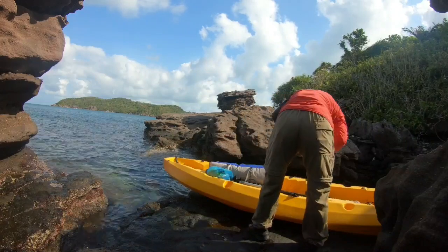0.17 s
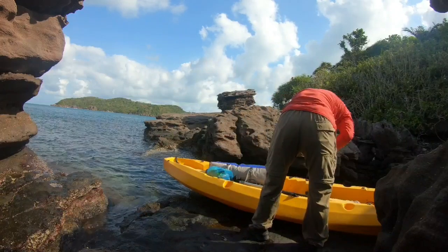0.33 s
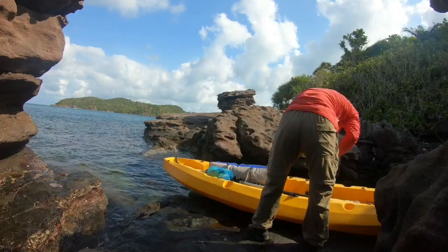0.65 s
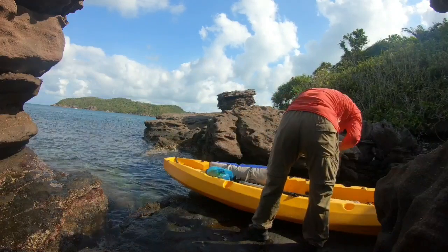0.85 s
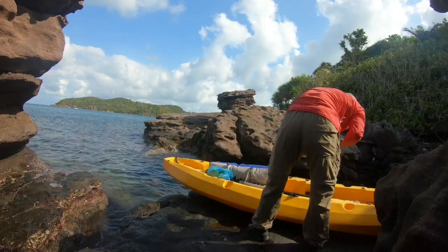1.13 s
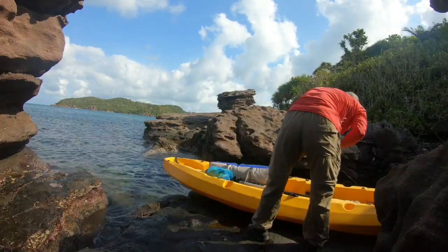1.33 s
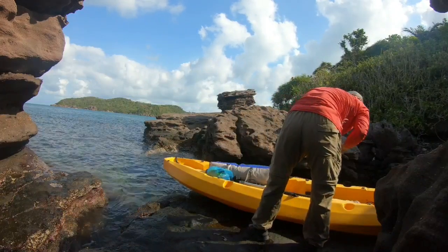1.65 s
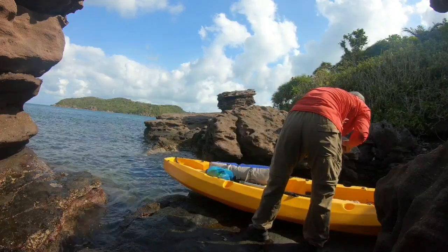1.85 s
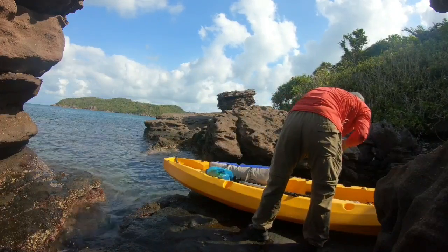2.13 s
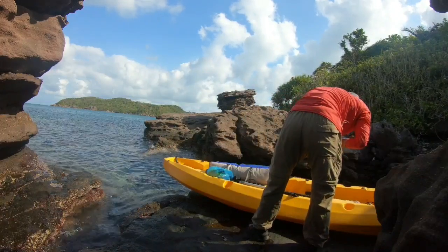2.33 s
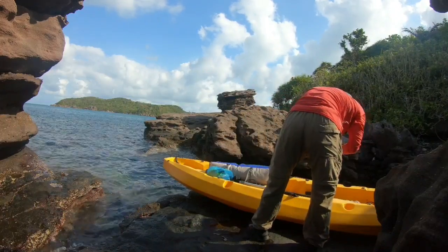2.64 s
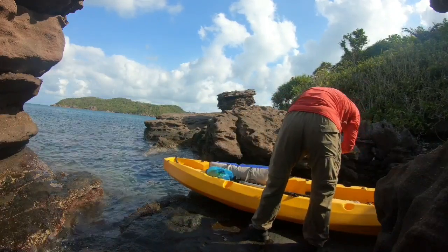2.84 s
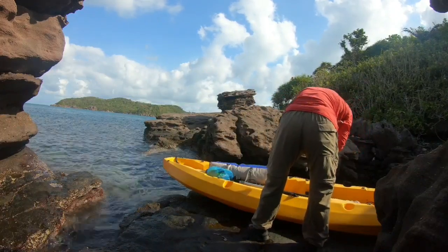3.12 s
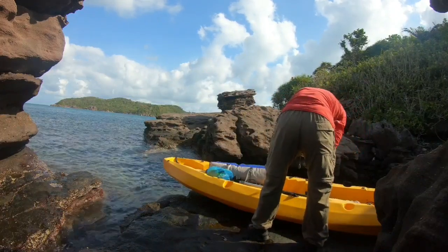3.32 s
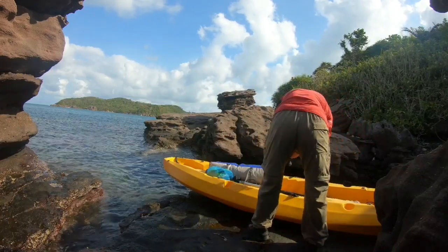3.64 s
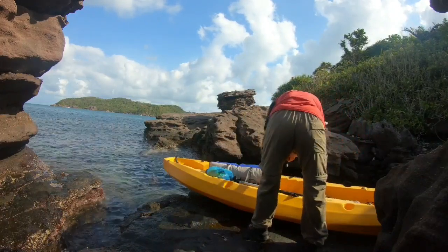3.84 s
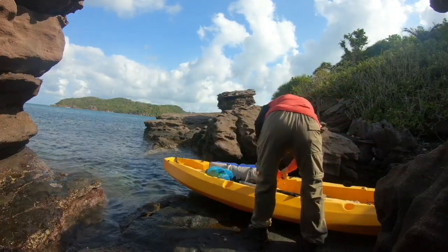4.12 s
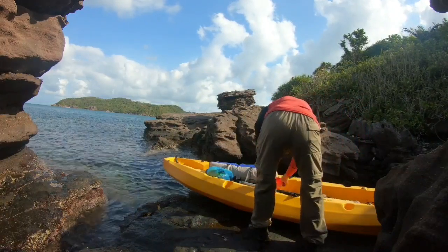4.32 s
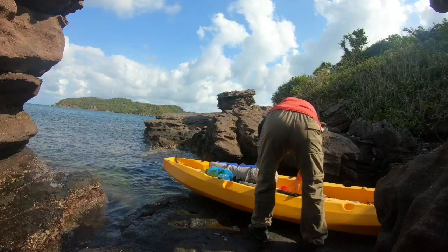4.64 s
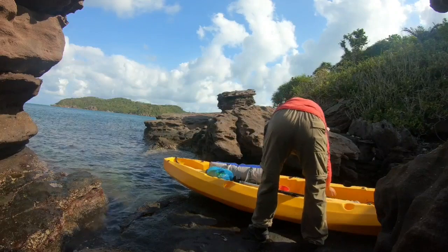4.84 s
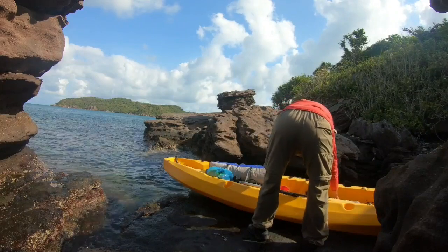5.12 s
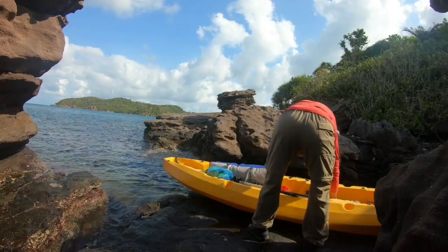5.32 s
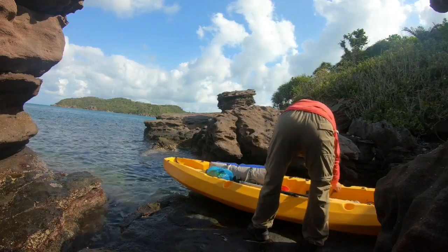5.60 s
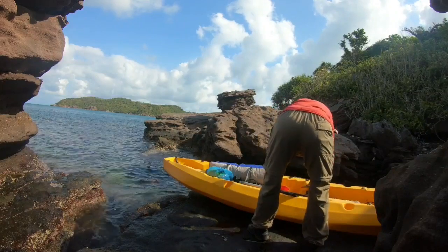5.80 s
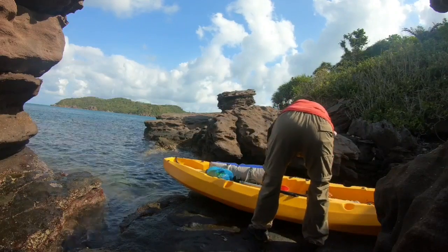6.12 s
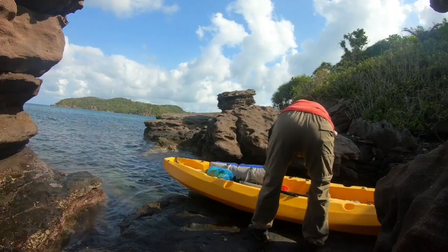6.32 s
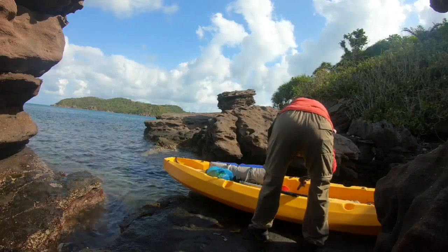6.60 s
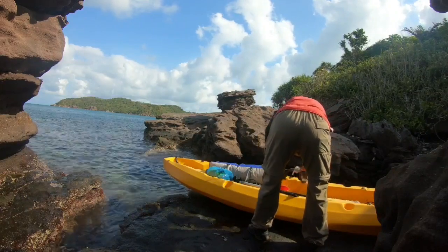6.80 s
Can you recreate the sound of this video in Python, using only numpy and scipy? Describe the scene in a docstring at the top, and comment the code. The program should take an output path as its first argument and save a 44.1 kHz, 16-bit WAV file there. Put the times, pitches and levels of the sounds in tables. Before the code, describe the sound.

Small sea waves wash, fizz and gurgle over shoreline rocks while gear knocks hollowly in a plastic kayak.

```python
"""Small waves wash over shoreline rocks beside a plastic kayak. First foam fizzes, water slaps and pockets of
air gulp. From 2 s a swell builds: gear knocks, water gurgles under the hull and a hollow there hums twice. It
crests near 2.8 s with a puff of breeze, then drains while drops tick. Gear clatters on the hull at 4.5 s and
again at 6 s, as a second swell runs in to the end. Throughout, a faint low rumble runs and two microphone ports
in a small housing colour each side."""
import sys
import numpy as np
from scipy import signal
from scipy.fft import rfft, irfft
from scipy.io import wavfile
from scipy.ndimage import uniform_filter1d

SR = 44100
rng = np.random.default_rng(int(sys.argv[2]) if len(sys.argv) > 2 else 0)


def store_wav(level_fs):
    """Save 16-bit WAV to argv[1]."""
    pcm = np.round(np.clip(np.atleast_2d(level_fs), -1, 1) * 32767)
    wavfile.write(sys.argv[1], SR, pcm.T.astype(np.int16))


N = 306936
TIME = np.arange(N) / SR

# Two swells run in and drain away: t/s, fizz level/dB, slosh over fizz/dB
SWELLS = [(0, -58, -16), (0.45, -59.5, -12.5), (0.7, -55, -16), (0.9, -53, -16), (1.1, -54, -28),
          (1.45, -49.5, -10.5), (1.95, -49, -10), (2.2, -44.5, -12.5), (2.6, -42.5, -14), (2.688, -49, -24),
          (2.78, -41, -5.5), (3.1, -46.5, -9), (3.25, -51.5, -7.5), (3.6, -55, -10), (4.15, -60.5, -13),
          (4.65, -59.5, -19), (4.9, -58, -9), (5.5, -56, -16), (5.7, -53.5, -9.5), (6.3, -49.5, -17),
          (6.96, -49, -13)]


def swells(spray_db=-15.5, lumps_db=2):
    """Slow envelopes of the wash: fizz, spattering spray above it, lumpy slosh below."""
    times, *columns = np.transpose(SWELLS)
    fizz_db, slosh_db = [np.interp(TIME, times, column) for column in columns]
    fizz, spray, slosh = from_db([fizz_db, fizz_db + spray_db, fizz_db + slosh_db + lumps_db * drift(7.7)])
    return np.array([fizz, spray * spatter(), slosh])


# Water slaps rock or hull: t/s, fizz level/dB, spray over fizz/dB, slosh over fizz/dB, fall/ms
SLAPS = [(0.369, -59.5, -6.5, -24, 50), (0.595, -52, -21, -17, 26), (0.655, -72, -22, 8.5, 14),
         (0.712, -50, -15, -27, 6.1), (0.75, -56, -6, -20, 1.5), (0.7752, -58, 2, -20, 1.2),
         (0.782, -50, -18, -11, 9.4), (0.7838, -63, -6, -20, 0.97), (0.74, -63.5, -20, -7, 18),
         (0.81, -60.5, -20, 0.5, 40), (0.87, -61.5, -15, 1, 19), (1.03, -58, -12, -7, 41),
         (1.15, -60, -9, -0.5, 37), (1.3945, -55.5, -4, -20, 1.3), (1.44, -50, -20, -11, 26),
         (1.68, -55.5, -5, 1, 10), (1.839, -52.5, -2, -20, 1.3), (1.893, -45.5, -13, -31, 47),
         (2.15, -47, -11, -21, 40), (2.25, -40, -17, -24, 22), (2.427, -40, -10, -7.5, 37),
         (2.472, -39.5, -15.5, -9.5, 29), (2.602, -46, -25, -23, 5.4), (2.625, -50, -10, -2, 42),
         (2.744, -38.5, -15, -28, 9.4), (2.854, -38.5, -18, -3.5, 14), (2.92, -44.5, -15.5, -16, 47),
         (3.06, -42, -17, -1, 21), (3.136, -56, 5.5, -15, 3.3), (3.33, -53.5, -35, 3, 21),
         (3.38, -52.5, -20, -20, 22), (3.43, -54.5, -28, 2.5, 11.5), (3.545, -51, -18, -2, 41),
         (3.675, -50, -15.5, -11, 8.5), (3.886, -59, -9, -16, 9.1), (4.469, -62, -6, -10, 2.7),
         (4.479, -59, 5, -10, 1.3), (4.495, -66, -5, -10, 3), (4.499, -53.5, -18, 5, 42),
         (4.52, -64, -2, -10, 2.5), (4.688, -57, -39, -20, 8.1), (4.974, -72, -16, -10, 7.4),
         (5.4, -62, -7, -15, 17), (5.457, -54, -16, -13, 13), (5.52, -52, -20, -15, 20),
         (5.58, -58, -10, -23, 12), (5.726, -53, -13, -12, 29), (5.821, -54.5, -3.5, -19, 5.4),
         (5.957, -63, -18, -17, 6), (5.992, -48.5, -11.5, -23, 16), (6.1, -53, -6.5, -3, 37),
         (6.18, -50, -14, -13, 9.5), (6.25, -56.5, -7, -1.5, 11), (6.301, -47.5, -18, -11, 28),
         (6.42, -49.5, -9, -19, 25), (6.539, -46.5, -13, -18, 31), (6.594, -48, -13.5, -11.5, 25),
         (6.67, -54.5, -9.5, 1, 38), (6.75, -40.5, -12, -8.5, 42), (6.795, -42, -21, -7.5, 35)]


def slaps():
    """Slap envelopes of fizz, spray and slosh: a fast attack, fastest in the spray, and a slower fall."""
    out = np.zeros((3, N))
    attack_share = 0.64 * np.array([[1], [.6], [1.2]])
    for s, fizz_db, spray_db, slosh_db, fall_ms in SLAPS:
        at = slice(max(int((s - .15) * SR), 0), int((s + .25) * SR))
        ms = (TIME[at] - s) * 1000
        attack = np.exp(-.5 * (ms / (attack_share * fall_ms)) ** 2)
        fall = np.exp(-.5 * (np.abs(ms) / fall_ms) ** 2.34)
        levels = from_db(fizz_db + np.array([[0], [spray_db], [slosh_db]]))
        out[:, at] += levels * np.where(ms < 0, attack, fall)
    return out


def foam(envelopes, laps_db=-8.5, patchy_db=1.8):
    """Dense bursting foam in narrow, drifting stereo bands; little laps jump up in all and die away."""
    bursts = rms_one(grains(2500, 1.83, count=3)) + 0.88 * rng.standard_normal((3, N))
    bursts = ports(bursts[0], bursts[1:])
    laps = rms_one(1 + from_db(laps_db) * jumps(per_s=40, spread_db=0.22, t60=.08, soften_samples=200))
    fizz_hz = np.geomspace(850, 3800, 9)
    spray_hz = np.geomspace(3800, 19000, 11)
    slosh_hz = np.geomspace(430, 950, 4)
    lap_depths = (1, .4, 1)   # the spray follows the laps only in part
    out = 0
    for envelope, edges, depth in zip(envelopes, (fizz_hz, spray_hz, slosh_hz), lap_depths):
        bands = [butter(bursts, 2, pair, "band") for pair in zip(edges, edges[1:])]
        layer = sum((-1) ** k * band * from_db(patchy_db * drift(18)) for k, band in enumerate(bands))
        out += envelope * laps ** depth * layer / np.sqrt(np.mean(layer.mean(0) ** 2))
    return out


def spatter(depth_db=-12):
    """Gain on the spray: each landing drop kicks it up within a few milliseconds and dies quickly."""
    return 1 + from_db(depth_db) * jumps(per_s=40, spread_db=2.6, t60=.03, soften_samples=120)


# Trapped air gulps and drops plink: t/s, f/Hz, peak level/dB
GULPS = [(0.607, 1320, -54), (0.636, 1460, -49.5), (0.62, 850, -50), (0.645, 654, -40), (0.665, 1240, -48),
         (0.73, 1450, -49), (0.74, 820, -49), (0.815, 1190, -48), (0.885, 690, -47), (0.765, 1300, -49),
         (0.8, 1340, -58), (0.83, 1290, -49), (0.874, 1100, -45), (0.928, 1350, -48), (1.0, 1250, -46),
         (1.016, 1330, -50), (1.032, 1370, -49), (1.048, 1300, -46), (1.068, 1300, -48), (1.084, 1320, -54),
         (1.101, 1330, -50), (1.117, 1320, -49), (1.132, 820, -44), (1.155, 1440, -47), (1.155, 855, -46),
         (1.176, 1330, -51), (1.18, 830, -52), (1.46, 1440, -42), (1.26, 800, -45), (1.33, 350, -63),
         (1.452, 602, -35), (1.517, 837, -38), (1.579, 410, -41.5), (1.607, 380, -49.5), (1.67, 1500, -50),
         (1.698, 865, -34.5), (1.722, 2490, -42), (1.878, 327, -51), (2.063, 225, -48.5),
         (2.09, 600, -35.5), (2.106, 1170, -41), (2.143, 297, -45), (2.153, 590, -24), (2.29, 344, -44),
         (2.31, 610, -43), (2.62, 400, -34), (2.623, 314, -44), (2.432, 807, -32), (2.435, 338, -41),
         (2.461, 356, -33), (2.844, 359, -34), (2.604, 569, -25.5), (2.7, 290, -52), (2.728, 268, -51),
         (2.75, 201, -52), (2.8, 620, -33), (2.83, 403, -40), (2.86, 640, -34), (2.87, 354, -47),
         (2.854, 813, -20.5), (2.914, 1450, -38), (2.993, 1360, -37), (3.068, 607, -32),
         (3.255, 414, -41.5), (3.275, 2540, -44.5), (3.319, 960, -36), (3.335, 1570, -40.5),
         (3.374, 1590, -37), (3.385, 1390, -42), (3.4, 1430, -42), (3.426, 1300, -45), (3.52, 1430, -48),
         (3.59, 2900, -45), (3.538, 1670, -39), (3.555, 1680, -45), (3.546, 1350, -45), (3.553, 900, -32),
         (3.556, 305, -50), (3.641, 836, -42), (3.676, 1434, -54), (3.749, 1480, -49), (3.88, 810, -48),
         (4.07, 840, -52), (4.919, 312, -50.5), (4.973, 1177, -44), (5.033, 275, -58), (5.19, 261, -51),
         (5.223, 306, -50), (5.261, 227, -54), (5.485, 860, -44), (5.59, 1470, -50), (5.67, 630, -42.5),
         (5.725, 1060, -42), (5.761, 1850, -47), (5.89, 1550, -45), (6.09, 1390, -49), (6.26, 1420, -45),
         (6.339, 567, -39), (6.43, 315, -46), (6.54, 850, -37), (6.519, 201, -51.5), (6.6, 159, -59),
         (6.666, 635, -34), (6.695, 385, -41), (6.753, 344, -31.5), (6.77, 885, -19), (6.742, 660, -53),
         (6.794, 260, -51), (6.8, 627, -32), (6.823, 330, -45), (6.858, 320, -52)]


def gulps(rise=0.017, waver=0.068, rough=0.31, smooth_below_hz=690):
    """Each pocket of air sings a short, unsteady note whose pitch climbs as it nears the surface."""
    out = np.zeros(N + SR)
    wobble, flutter = np.tile(drift(53), 2), np.tile(drift(96), 2)
    for s, hz, peak_db in GULPS:
        width_ms = 3.855 + 8 * 1000 / hz   # low notes last longer
        age = np.arange(-width_ms, 2 * width_ms, 1000 / SR) / width_ms   # 0 at the peak
        envelope = np.exp(-np.where(age < 0, 12, 2.5) * age ** 2)
        start = int((s - width_ms / 1000) * SR)
        at = slice(start, start + len(age))
        bend = wobble[at] - np.average(wobble[at], weights=envelope)
        tone = sine(hz * (1 + rise * age + waver * bend))
        grit = rough * hz / (hz + smooth_below_hz)   # big pockets sing smoother than small drops
        out[at] += from_db(peak_db) * envelope * tone * (1 + grit * np.tanh(flutter[at]))
    return out[:N]


def bubbles(fizz, level_db, low_hz, high_hz, pitches):
    """Small bubbles swell and ring at scattered pitches, riding the fizz envelope."""
    clicks = grains(500, 3)[0]
    pitch_index = rng.integers(0, pitches, N)
    out = 0
    for k, hz in enumerate(np.geomspace(low_hz, high_hz, pitches)):
        onsets = ring(clicks * (pitch_index == k), hz, t60=5.1 / hz)
        out += rms_one(ring(onsets, hz, t60=340 / hz)) * from_db(2 * drift(22))
    return from_db(level_db) * fizz * rms_one(out)


# Modes of the plastic hull: f/Hz, level/dB, t60/s
HULL_MODES = [(72, -22, 0.24), (109.6, -8.5, 0.27), (136, -6, 0.23), (160.6, -9, 0.31), (191.3, -4, 0.21),
              (225, -5, 0.18), (255.6, -8.5, 0.096), (284, -3, 0.2), (333.7, -6, 0.11), (393, 2.5, 0.087),
              (457, -5.5, 0.15), (515.6, 15.5, 0.1), (624.7, 7.5, 0.15), (720, -4, 0.04), (960, 6, 0.021),
              (1147, 18.5, 0.015), (1437, 3, 0.07), (1850, 8, 0.014), (2330, 14.5, 0.037)]
# Gear hits the hull: t/s, blow level/dB, low roll-off/Hz, hardness/Hz, contact/ms, crack level/dB
KNOCKS = [(1.884, -47, 90, 150, 5.6, -60), (2.129, -38.5, 270, 700, 19, -55),
          (2.597, -37, 250, 704, 4.4, -36), (4.449, -44.5, 100, 300, 11, -60),
          (4.46, -33, 120, 450, 16, -41), (4.476, -37.5, 100, 1590, 3.8, -19),
          (4.484, -30.5, 120, 500, 12, -38), (4.498, -37.5, 110, 500, 22, -42),
          (4.511, -37, 100, 400, 11, -55), (4.519, -41, 100, 1000, 10, -28),
          (4.529, -38, 120, 600, 17, -42), (4.545, -44, 100, 600, 8.8, -55), (4.577, -37, 120, 500, 9, -51),
          (4.6, -43, 80, 400, 13, -60), (4.626, -45, 70, 250, 13, -60), (4.647, -44, 61, 202, 21, -60),
          (5.992, -32.5, 59.6, 297, 10.6, -46), (6.027, -35.5, 50, 200, 25, -55),
          (6.061, -37, 60, 252, 2.7, -55), (6.087, -43, 80, 300, 12, -52),
          (6.116, -43.5, 120, 400, 7.8, -50)]


def knocks(samples=1500):
    """Gear lands in short, rough contacts that crack and ring the hull modes."""
    hz = np.array(HULL_MODES)[:, :1]
    ms = np.arange(samples) * 1000 / SR
    blows, crack = np.zeros((len(hz), N)), np.zeros(N)
    crack_envelope = np.minimum(ms / 1.6, 1) * (np.exp(-ms / 1.7) + 0.39 * np.exp(-ms / 24))
    for s, blow_db, low_hz, hard_hz, contact_ms, crack_db in KNOCKS:
        noise = rng.standard_normal((len(hz) + 1, samples))
        contact = noise[:-1] * ms * np.exp(-3 * ms / contact_ms)
        # every mode gets a fair share of the blow
        at_mode = np.abs(np.sum(contact * np.exp(-2j * np.pi * hz * ms / 1000), 1, keepdims=True))
        contact /= np.sqrt(.7 * at_mode ** 2 + .3 * np.sum(contact ** 2, 1, keepdims=True))
        # soft blows miss the high modes, light ones the low
        reach = 1 / (1 + (hz / hard_hz) ** 2) / (1 + (low_hz / hz) ** 2.9)
        at = slice(int(s * SR), int(s * SR) + samples)
        blows[:, at] += from_db(blow_db) * contact * reach
        crack[at] += from_db(crack_db) * noise[-1] * crack_envelope
    body = sum(from_db(db) * ring(blow, f, t60) for blow, (f, db, t60) in zip(blows, HULL_MODES))
    return body + butter(crack, 2, [900, 2100], "band") + 0.5 * crack


# Surges under the hull: t/s, level/dB, hold/s
SURGES = [(1.88, -58, 0.083), (2.005, -45.5, 0.062), (2.128, -44, 0.21), (2.397, -37, 0.058),
          (2.596, -43.5, 0.14), (2.793, -36.5, 0.06), (2.95, -51, 0.21), (3.186, -51, 0.11),
          (3.49, -49, 0.11), (3.61, -59.5, 0.15), (4.58, -54, 0.098), (4.91, -54, 0.21), (5.16, -58, 0.089),
          (5.424, -57, 0.037), (5.95, -45.5, 0.12), (6.305, -49, 0.13), (6.494, -57, 0.25),
          (6.7, -36.5, 0.048)]


def gurgle(fizz, undertow_db=-14, attack_s=0.036, drain_t60=0.48):
    """Lumpy water rings the hull's low modes; surges rise, hold and drain over an undertow that follows the
    fizz."""
    surges = 0
    for s, db, hold in SURGES:
        attack = np.clip((TIME - s) / attack_s, 0, 1)
        surges += attack * from_db(db - 60 * np.maximum(TIME - s - hold, 0) / drain_t60)
    lumps = rng.standard_normal(N) * from_db(3.3 * drift(25.6))
    body = sum((-1) ** k * (hz / 200) ** 1.39 * ring(lumps, hz, t60=0.09)   # wet plastic rings briefly
               for k, (hz, _, _) in enumerate(HULL_MODES[2:13]))
    return np.hypot(from_db(undertow_db) * fizz, surges) * rms_one(butter(body, 6, 125, "high"))


# Single drops tick on rock or hull: t/s, f/Hz, level/dB, t60/ms
DROP_TICKS = [(0.369, 2610, -39.5, 21), (0.374, 3050, -39, 12), (0.538, 1350, -43, 14),
              (0.7083, 1570, -42, 22), (0.748, 2700, -37, 10), (0.7759, 3150, -26, 14),
              (0.781, 2700, -39, 15), (0.784, 2400, -34, 11), (1.394, 2890, -31.5, 29),
              (1.668, 4200, -26, 20), (1.838, 3080, -27.5, 17), (1.892, 1930, -34, 29),
              (2.103, 1810, -39, 18), (2.595, 1584, -31.5, 42), (2.7402, 1420, -36, 33),
              (3.0467, 1410, -34, 29), (3.248, 3440, -35, 20), (3.326, 1365, -37.5, 71),
              (3.796, 2180, -39, 28), (3.977, 1510, -42, 28), (4.2064, 1630, -43.5, 38),
              (4.519, 1560, -33, 21), (4.678, 1560, -44.5, 35), (5.092, 1330, -42.5, 22),
              (5.362, 1220, -42, 39), (5.404, 2950, -41, 18), (5.7188, 1190, -36, 25),
              (5.841, 2820, -36, 18), (5.898, 1510, -50, 20), (5.9543, 2570, -37.5, 27),
              (5.991, 4230, -25, 38), (6.121, 3300, -29.5, 31), (6.2433, 1590, -39, 34),
              (6.4961, 2510, -38, 18), (6.5375, 2800, -43, 18), (6.597, 1230, -28.5, 21)]


def drop_ticks(attack_ms=0.62, rough=.3, snap_db=-24, snap_ms=0.52):
    """A drop lands with a broadband snap and a short, rough ring."""
    out, ms = np.zeros(N + SR), np.arange(1300) * 1000 / SR
    for s, hz, db, t60_ms in DROP_TICKS:
        snap, grit = rng.standard_normal((2, len(ms)))
        snap *= from_db(snap_db) * np.exp(-ms / snap_ms)
        tone = np.sin(2 * np.pi * hz * ms / 1000) + rough * rms_one(ring(grit, hz, t60=.008))
        envelope = (1 - np.exp(-ms / attack_ms)) * from_db(-60 * ms / t60_ms)
        start = int(s * SR)
        out[start:start + len(ms)] += from_db(db) * (tone * envelope + snap)
    return out[:N]


# A hollow under the hull hums after two slaps: t/s, f/Hz, level/dB
HOLLOW_HUM = [(2.122, 230, -70), (2.137, 231, -40.5), (2.165, 219.6, -38.5), (2.22, 216.2, -48.5),
              (2.28, 215, -42), (2.36, 206, -54), (2.41, 213, -76), (2.59, 225, -74), (2.62, 224.3, -45.5),
              (2.653, 215.2, -38), (2.69, 214.2, -55), (2.76, 203, -52), (2.8, 205, -65)]


def hollow_hum(waver=0.032, throb_db=2.5, breathy=.3):
    """The air under the hull hums on a sinking, throbbing note with a breathy edge."""
    times, hz, db = np.transpose(HOLLOW_HUM)
    pitch = np.interp(TIME, times, hz) * (1 + waver * drift(42.4))
    level = from_db(np.interp(TIME, times, db) + throb_db * drift(27))
    gate = (TIME > times[0]) & (TIME < times[-1])
    breath = rms_one(ring(rng.standard_normal(N), hz.mean(), t60=.04))
    return gate * level * (sine(pitch) + breathy * breath)


# Spectrum of the faint low rumble: f/Hz, relative level/dB
RUMBLE_SPECTRUM = [(20, -10.5), (60, -2.5), (100, -31), (140, 3), (200, 4), (350, -3), (500, -15), (700, -21),
                   (1100, -83)]


def low_rumble(level_db=-71, puff_at_s=2.81, puff_db=17, puff_spread_s=0.08):
    """Faint low rumble, different on each side; a breeze brushes the ports in one deep puff."""
    noise = rfft(rng.standard_normal((2, N)))
    rumble = rms_one(irfft(noise * from_db(at_hz(RUMBLE_SPECTRUM)), N))
    puff = from_db(puff_db) * np.exp(-.5 * ((TIME - puff_at_s) / puff_spread_s) ** 2)
    return from_db(level_db) * (rumble + puff * butter(rumble, 4, 90, "low"))


# Colour of each microphone port: f/Hz, level/dB
LEFT_PORT_EQ = [(340, 0), (520, -18), (600, -7), (720, -8.5), (830, -1), (950, -11), (1100, -3.5),
                (1420, 3.5), (1980, -9), (2250, -6), (2400, -5), (2620, -6), (2970, 3), (3960, -20.5),
                (4900, -18.5), (5150, -15), (5430, -15), (6070, -33), (6890, -23.5), (7500, -28.5),
                (10000, -31), (15000, -38)]
RIGHT_PORT_EQ = [(340, 0.5), (520, -20.5), (650, -6.5), (760, -10), (950, -3), (1420, 5), (1650, 1.3),
                 (1830, 4), (2060, -4.5), (2580, 3.5), (3100, -7), (3450, -5.5), (4050, -20), (5510, -9.5),
                 (6290, -22.5), (7110, -30), (9260, -27), (11500, -35), (15000, -34)]
# Water noise common to both ports: f/Hz, share of power/0-1
COMMON_SHARE = [(340, 0.89), (520, 0.37), (690, 0.81), (780, 0.92), (1000, 0.53), (1500, 0.89),
                (1850, 0.66), (2070, 0.026), (2300, 0.19), (2750, 1), (3010, 0.15), (3500, 0.46),
                (4010, 0.075), (4800, 0.89), (5600, 0.91), (7000, 0.04), (15590, 0.087)]
# The right port leads the left: f/Hz, phase/rad
RIGHT_LEAD = [(340, 0.13), (480, 0.77), (600, 1.32), (700, 2.66), (850, 1.73), (1030, 3.5), (1250, 4.66),
              (1900, 5.8), (2300, 6.06), (2800, 7.43), (3050, 5), (3500, 5.16), (3900, 5.6), (4500, 4.17),
              (5500, 2.15), (6600, 0.79), (12000, 0.085)]


def ports(common, own=None):
    """Each port adds its colour and phase; own is a pair of signals that reach one port each."""
    spectra = rfft(common)
    if own is not None:
        share = np.clip(at_hz(COMMON_SHARE), 0, 1)
        spectra = np.sqrt(share) * spectra + np.sqrt(1 - share) * rfft(own)
    phase = np.exp(.5j * at_hz(RIGHT_LEAD) * [[-1], [1]])
    colour = from_db([at_hz(LEFT_PORT_EQ), at_hz(RIGHT_PORT_EQ)])
    return irfft(spectra * phase * colour, N)


def grains(per_s, spread_db, count=1):
    """Tracks of random clicks, uneven in size and sign."""
    sizes = from_db(spread_db * np.minimum(rng.exponential(1, (count, N)), 5))
    signs = rng.choice([-1, 1], (count, N))
    return sizes * signs * (rng.random((count, N)) < per_s / SR)


def jumps(per_s, spread_db, t60, soften_samples):
    """An envelope that kicks up at random moments and decays."""
    kicks = np.abs(grains(per_s, spread_db)[0])
    decays = signal.lfilter([1], [1, -from_db(-60 / (t60 * SR))], kicks)
    return uniform_filter1d(decays, size=soften_samples)


def drift(hz):
    """Smooth random modulation of unit rms, rolling off above hz."""
    pole = np.exp(-2 * np.pi * hz * 40 / SR)   # one step every 40 samples
    slow = signal.lfilter([1], [1, -2 * pole, pole * pole], rng.standard_normal(N // 40 + 2002))[2000:]
    return np.interp(np.arange(N) / 40, np.arange(len(slow)), rms_one(slow))


def ring(drive, hz, t60):
    """Resonator: a unit click sets a sine of height 1 ringing."""
    r, w = from_db(-60 / (t60 * SR)), 2 * np.pi * hz / SR
    return signal.lfilter([0, np.sin(w)], [1, -2 * r * np.cos(w), r * r], drive + 1e-18)


def sine(hz):
    """A sine that follows a pitch curve."""
    return np.sin(2 * np.pi * np.cumsum(hz) / SR)


def butter(x, order, hz, kind):
    """Low-, high- or band-pass filter."""
    return signal.sosfilt(signal.butter(order, hz, kind, fs=SR, output="sos"), x)


def at_hz(points):
    """A table of f/Hz and value on the FFT grid, straight on a log axis."""
    hz, value = np.transpose(points)
    return np.interp(np.log(np.arange(1, N // 2 + 2) * SR / N), np.log(hz), value)


def from_db(db):
    """Decibels to gain."""
    return 10 ** (np.asarray(db) / 20)


def rms_one(x):
    """Scale to unit rms."""
    return x / np.sqrt(np.mean(x ** 2) + 1e-20)


def scene():
    """Wide foam, with bubbles, hull and drops as point sources at the ports, over a faint low rumble."""
    wash = swells()
    fizz = wash[0]
    water = foam(np.hypot(wash, slaps()))
    near = bubbles(fizz, level_db=-2.5, low_hz=450, high_hz=3800, pitches=32)
    near += bubbles(fizz, level_db=-8, low_hz=4000, high_hz=11000, pitches=20)
    near += gulps() + knocks() + gurgle(fizz) + drop_ticks() + hollow_hum()
    near = butter(near, 6, 63, "high")   # small sources radiate no deep bass
    return water + ports(near) + low_rumble()


def record(dry, cutoff_hz=15770):
    """A steep low-pass takes off the very top."""
    return signal.sosfilt(signal.ellip(12, .5, 60, cutoff_hz, fs=SR, output="sos"), dry)


dry = scene()
out = record(dry)
store_wav(out)
```